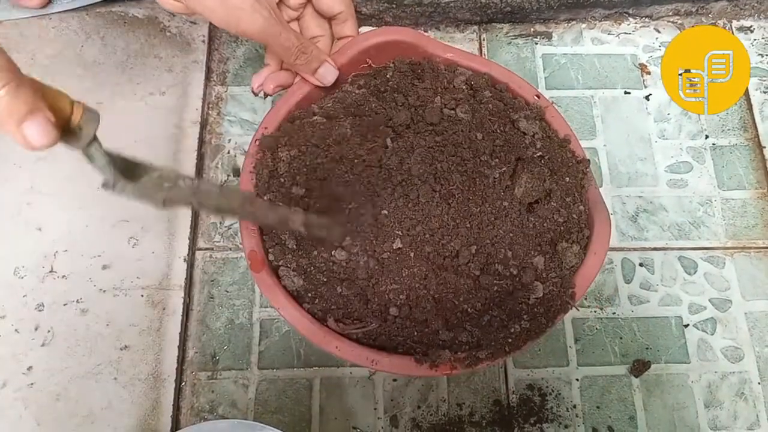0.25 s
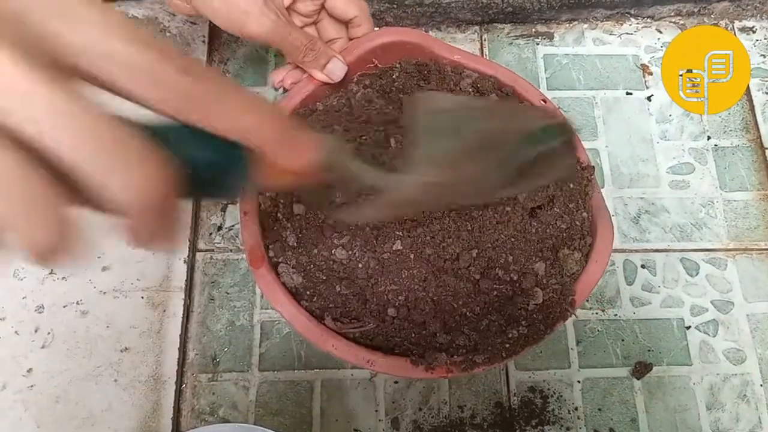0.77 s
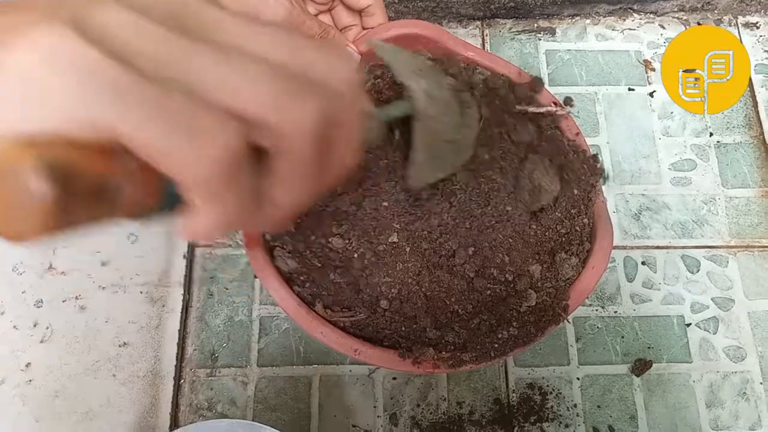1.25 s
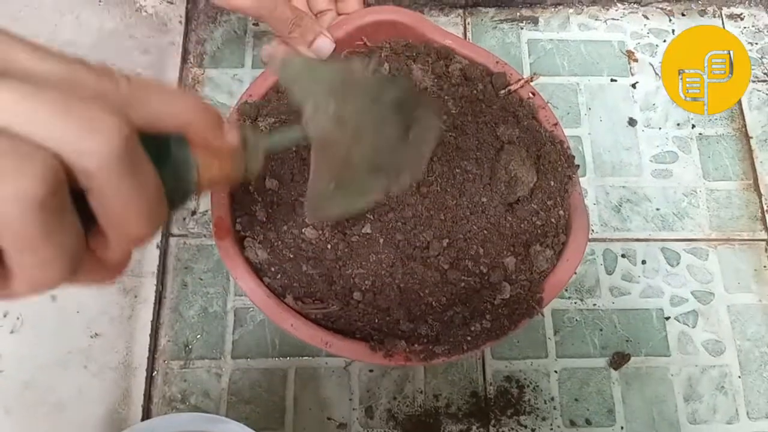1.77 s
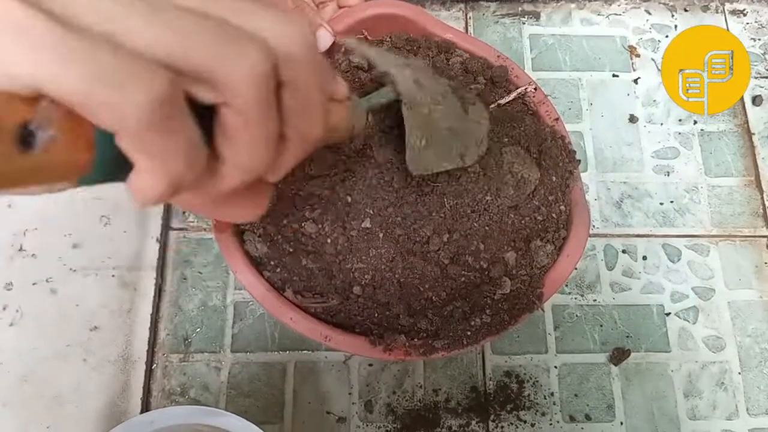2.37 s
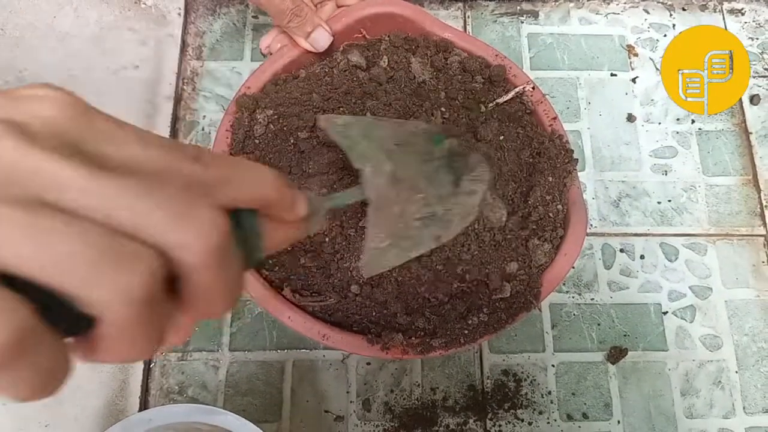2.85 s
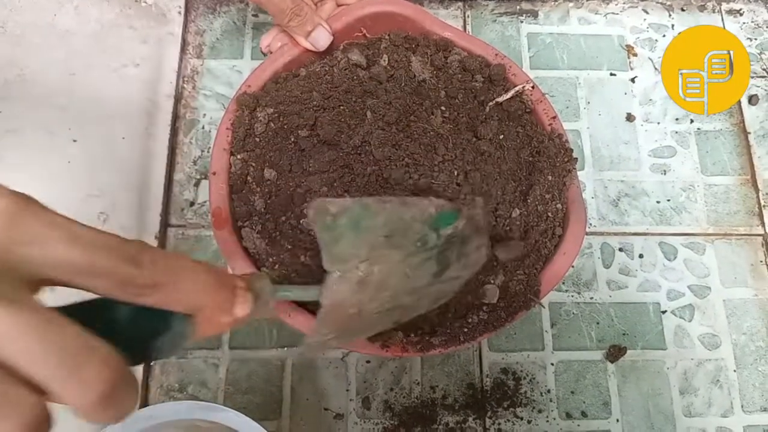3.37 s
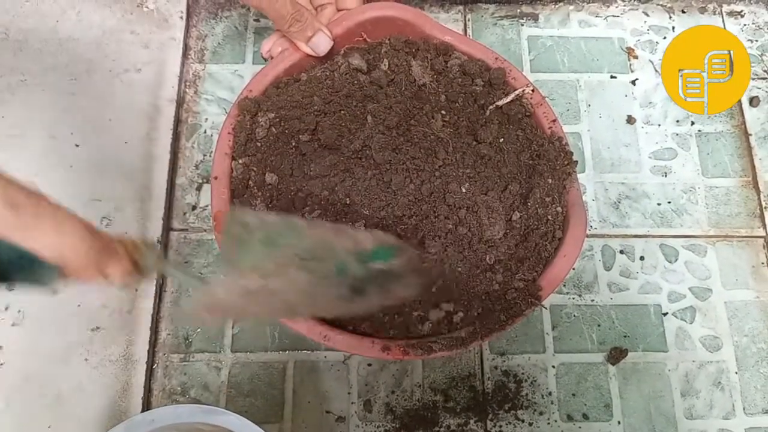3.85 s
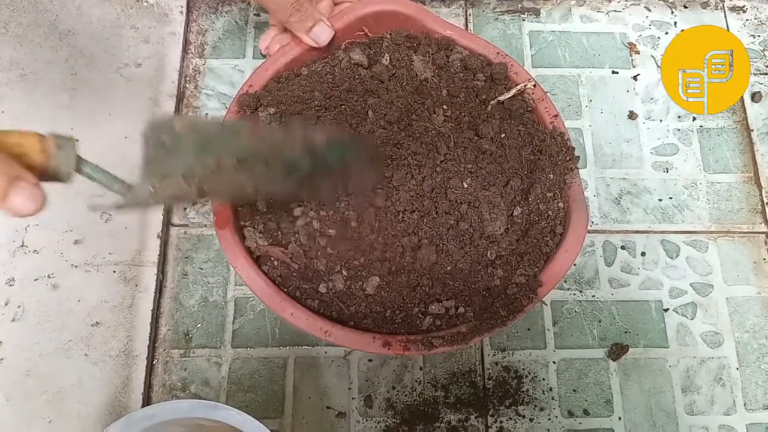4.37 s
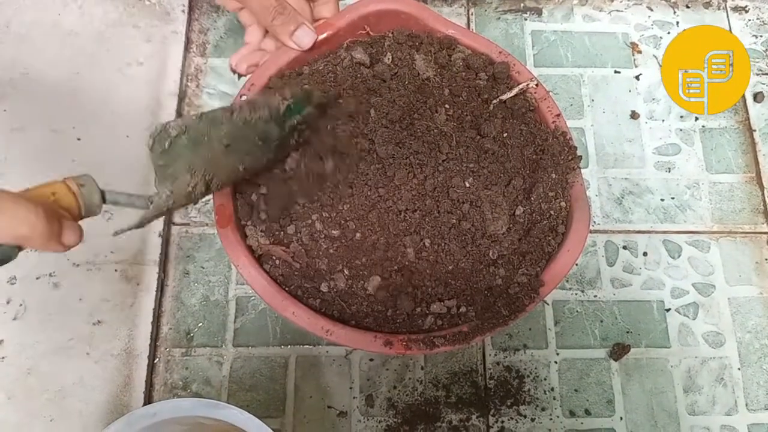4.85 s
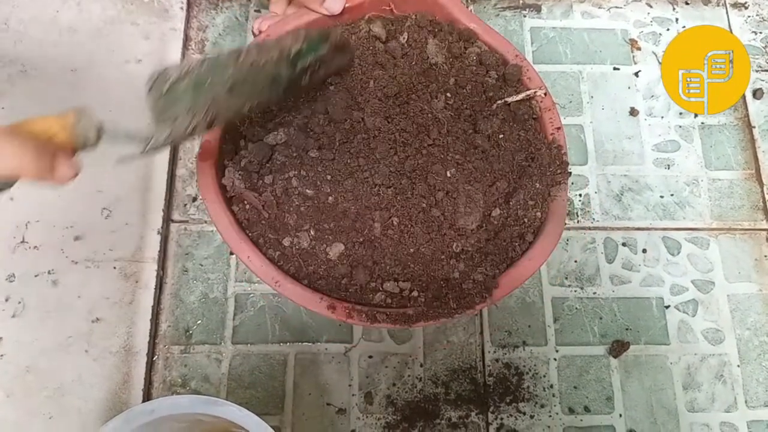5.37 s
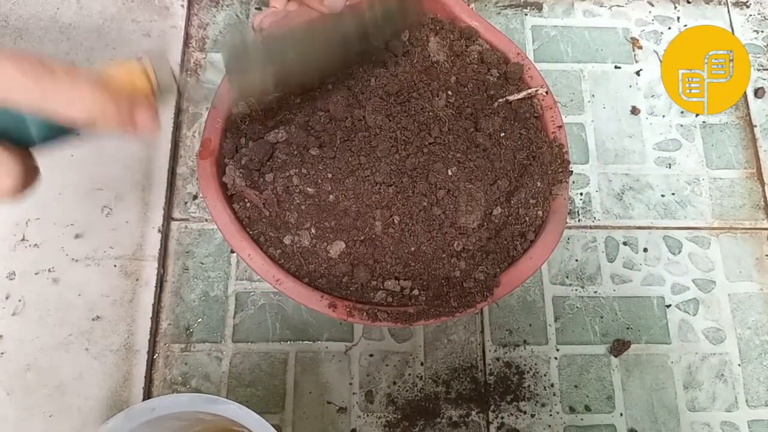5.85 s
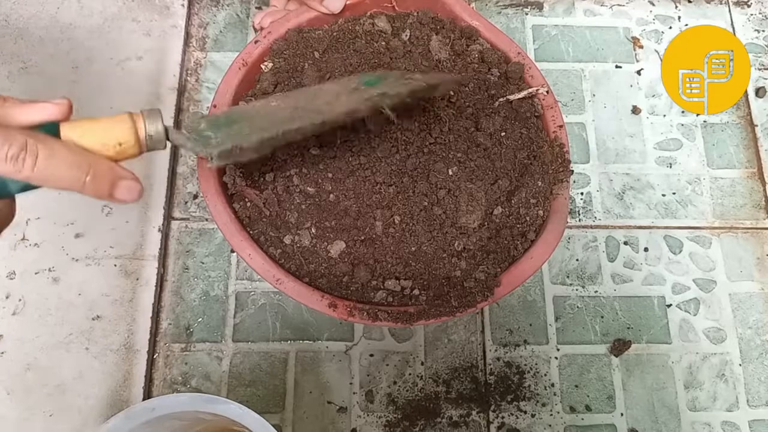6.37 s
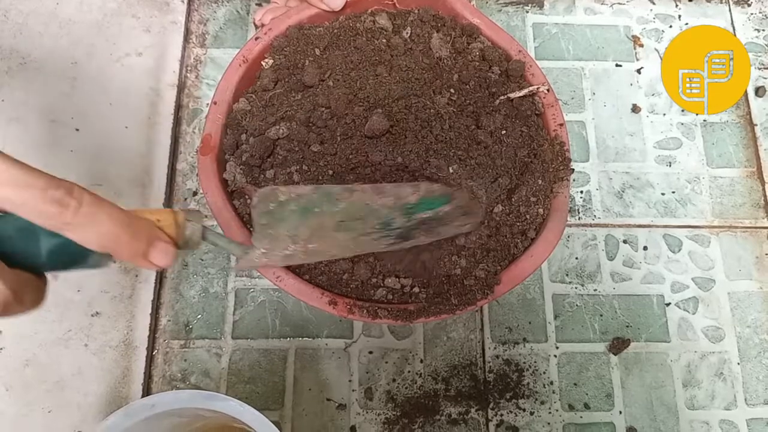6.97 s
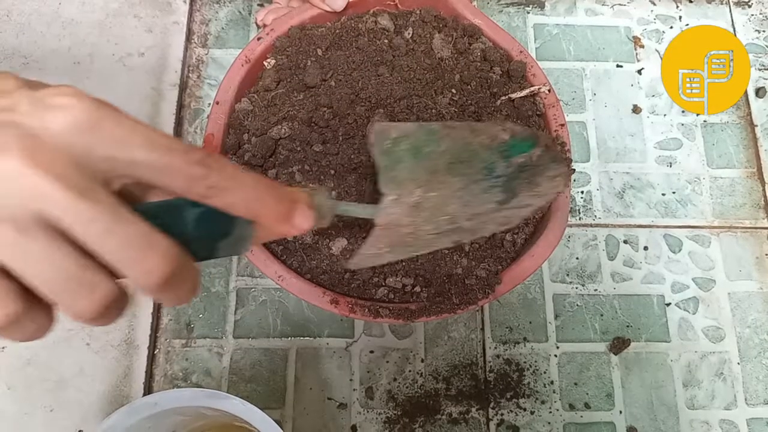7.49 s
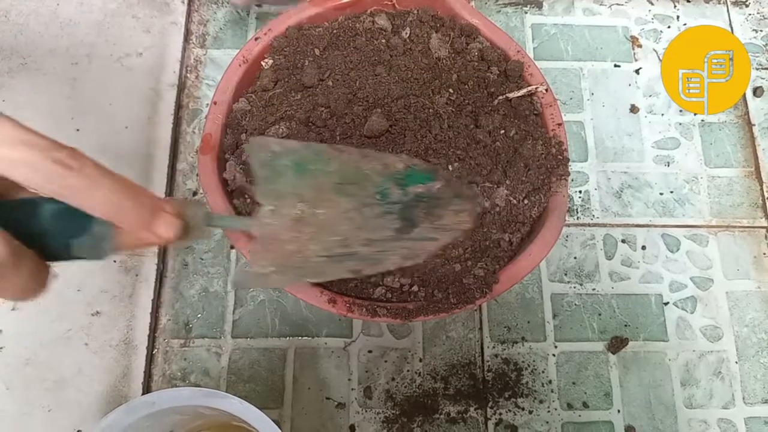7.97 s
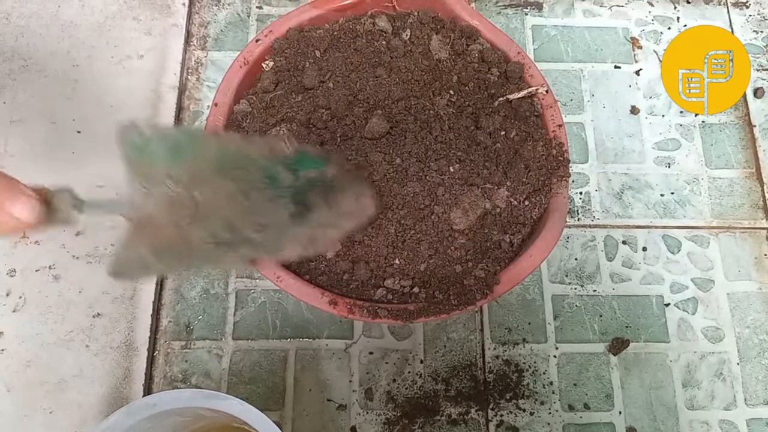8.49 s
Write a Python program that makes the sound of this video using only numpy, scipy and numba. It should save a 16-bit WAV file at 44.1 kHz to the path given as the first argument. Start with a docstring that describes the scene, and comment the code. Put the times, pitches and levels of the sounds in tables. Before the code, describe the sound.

A steel hand trowel works dry soil in a plastic pot, close to the microphone. It scrapes and pats in uneven strokes: grit rasps along the metal, the blade clinks briefly and the pot answers with hollow knocks. The work starts softly, a few crumbs tick on the steel, then it grows louder, with the hardest knock about halfway. A tiled porch adds a short echo over faint, distant town noise.

```python
"""Over distant town noise, a steel hand trowel works dry soil in a plastic pot on a tiled porch.
From the start it scrapes and pats: dragged grit rattles blade and pot, blows ring one and thump the other.
From 1.6 to 2 s, crumbs drop off the lifted blade and tick on the steel; then the work grows louder.
At 4.3 s comes the hardest blow on the pot, with the first of five soft, low handling thumps.
Scraping and patting go on to the end, and the porch adds a short echo to them all along."""
import sys
import numpy as np
from scipy import signal
from scipy.fft import rfft, irfft
from scipy.io import wavfile
from scipy.ndimage import uniform_filter1d
from numba import njit

SR = 44100
rng = np.random.default_rng(int(sys.argv[2]) if len(sys.argv) > 2 else 0)


def generate_wav(signal):
    """Clip the signal to [-1, 1] and save it as 16-bit WAV at the path in sys.argv[1]."""
    frames = np.transpose(np.atleast_2d(signal))
    scaled = np.clip(frames, -1, 1) * 32767
    pcm = np.round(scaled).astype(np.int16)
    wavfile.write(sys.argv[1], SR, pcm)


N = 384552

# Tone curves for the town, the rasp of soil and the hiss of fine grit: f/Hz, level/dB
TOWN_TONE = [(25, -16.5), (87, 2.5), (200, -6.5), (263, 2), (326, -4), (591, -3), (1040, -10), (2160, -15),
             (3160, -13.5), (6210, -25), (8140, -43), (12200, -44.5), (16000, -42)]
RASP_TONE = [(700, -22), (1000, -14.5), (1700, -10.5), (3100, -5.5), (4450, -12), (4900, -18.5),
             (5400, -13), (6400, -14.5), (7400, -25.5), (8500, -42.5)]
GRIT_TONE = [(7000, -28.5), (7600, -0.5), (8600, 2), (13400, -5), (15100, -2), (16000, -23)]
# Scrapes: t/s at full pressure, rise/s, hold/s, rasp level/dB, pot level/dB above the rasp,
# pot f/Hz, soil fineness/dB (higher is brighter)
SCRAPES = [(0.0, .01, 0.012, -46.5, -8, 823, -17), (0.836, 0.083, .1, -40.5, -2, 550, -20),
           (0.978, 0.027, 0.15, -42.5, -12, 653, -10.5), (1.22, 0.1, 0.064, -42, -17, 668, -7),
           (1.295, 0.017, 0.093, -37.5, -4.5, 693, -18.5), (1.556, 0.0084, 0.024, -44, -3, 600, 7.5),
           (1.628, 0.12, 0.05, -47, -3.5, 700, -5.5), (1.803, .15, 0.25, -74, 17.5, 485, -1.5),
           (2.256, 0.03, 0.0093, -51, -2.5, 853, -13), (2.345, 0.037, 0.062, -34.5, -10.5, 608, -5.5),
           (2.461, 0.054, 0.0059, -35.5, -23, 684, -7), (2.87, 0.03, 0.047, -33.5, -9.5, 770, -8.5),
           (2.932, 0.041, 0.012, -25, -8, 820, -5), (3.21, 0.028, 0.056, -38.5, -9.5, 561, -11),
           (3.775, 0.084, 0.14, -29, -3, 784, -12.5), (3.99, 0.047, 0.087, -28, -2.5, 726, -19.5),
           (4.303, 0.0049, 0.012, -22, -2.5, 628, -29), (4.367, 0.016, 0.057, -42.5, -1, 590, -25.5),
           (4.593, 0.54, 0.021, -47.5, 11, 542, -17.5), (5.09, 0.052, 0.19, -28.5, -3, 506, -11.5),
           (5.204, 0.051, 0.077, -23.5, 0, 483, -10.5), (7.12, 0.16, 0.15, -77, 30.5, 377, -4.5),
           (7.767, 0.035, 0.012, -52, 10.5, 358, -18), (7.987, 0.2, 0.028, -44, -7, 609, -11.5),
           (8.183, 0.14, 0.048, -30.5, -3.5, 482, -16.5), (8.275, 0.038, 0.067, -43.5, -1, 441, -14.5),
           (8.48, 0.35, 0.075, -53.5, 6, 448, -16)]
# Modes, the tones that blade and pot ring with: f/Hz, level/dB, time to fade by 60 dB/s
BLADE_MODES = [(1260, -18, .3), (1670, -14, .2), (1850, -13, .15), (2350, -10, .22), (2600, -9, .25),
               (2830, -13, .15), (3170, 0, .36), (3420, -6, .3), (4200, -12, .28), (4500, -6, .38),
               (5290, -7, .3), (5830, -8, .28), (6400, -11, .36), (7140, -20, .15)]
POT_MODES = [(263, -12, 0.37), (395.7, -18.5, 0.18), (487.8, -2.5, 0.13), (634.6, -8.5, 0.11),
             (713.9, -2.5, 0.066), (800, 2, 0.027), (890.2, -5, 0.12)]
# How freely the main blade mode sounds while dragged through soil: t/s, level/dB
DRAG_RINGING = [(2.4, -8), (2.95, 10), (3.8, 0), (4.05, -6), (7.9, 1.5)]
# Blows: t/s, blade level/dB, pot level/dB, crunch level/dB, brightness f/Hz, contact time/ms,
# main mode boost/dB
TROWEL_BLOWS = [(0.033, -70, -44.5, -48, 2500, 3.9, 4), (0.203, -54, -55, -45.5, 2250, 1.7, -16),
                (0.227, -49, -76, -51, 4500, 1.1, 6), (0.299, -79, -51, -47.5, 1920, 0.85, -25),
                (0.349, -44.5, -80, -62, 3980, 3, 10.5), (0.42, -35, -68, -60, 3080, 13.3, 20),
                (0.446, -36, -71, -42, 1830, 0.93, -10), (0.808, -53, -48, -29.5, 2480, 14.4, -38),
                (0.968, -65, -21.5, -29.5, 1920, 0.54, -26), (1.057, -68, -39.5, -30.5, 4120, 6, -2),
                (1.25, -20, -28, -16, 4120, 23.8, -9), (1.3, -50, -26, -24, 2620, 6.9, -13),
                (1.564, -47, -41.5, -32, 7000, 1.4, -20), (2.393, -36, -32, -28, 4340, 9.8, -21),
                (2.469, -33, -44.5, -36.5, 4050, 12, -13), (2.67, -21.5, -15.5, -21.5, 2200, 5.2, -23),
                (2.869, -29.5, -36, -46, 3770, 7.4, -5), (3.195, -24, -24.5, -26, 4230, 3.7, -23),
                (3.467, -43.5, -75, -34.5, 3000, 6, 7), (3.677, -32.5, -36, -41, 3270, 16.4, -0.5),
                (3.792, -13.5, -36, -26.5, 3560, 5.3, 13.5), (4.066, -57, -21, -32, 2740, 4.4, -6.5),
                (4.276, -87, -7.5, -10, 1530, 2.57, -8), (4.808, -38, -15, -15.5, 2900, 2.3, -12),
                (4.904, -40, -66, -19, 4900, 9.7, -10), (5.205, -42, -19, -15.5, 4300, 6, -24),
                (5.52, -17.5, -67, -16.5, 4760, 0.75, 3), (5.776, -53, -54.5, -40, 4150, 19, -7),
                (5.976, -28, -38, -19.5, 5360, 12, -30), (6.147, -25, -43, -29.5, 3370, 4.9, -2),
                (6.33, -30, -37, -30, 2760, 2.6, -7), (6.509, -23.5, -34, -23, 3020, 1.05, -0.5),
                (6.709, -15.5, -40, -11.5, 3440, 0.55, -3.5), (7.051, -35, -56.5, -37.5, 4660, 13, -1),
                (7.368, -27.5, -14, -21, 1850, 2.9, -3), (7.41, -61, -30.5, -27.5, 3060, 5.4, -23),
                (7.68, -33, -25.5, -26.5, 2720, 7, 1), (7.758, -47, -62, -42.5, 3770, 15, -6),
                (7.897, -33.5, -40.5, -58, 3440, 7.1, 2), (8.094, -36.5, -30, -41, 2840, 0.47, 21),
                (8.142, -31.5, -54, -60, 3160, 2.1, 16), (8.165, -43, -54, -26, 3500, 5.1, -3),
                (8.207, -30, -26, -23.5, 2570, 4.3, -6), (8.481, -45.5, -44, -40, 3000, 17.7, 8)]
# Boost of the pot's lowest mode, set by where the blade lands: t/s, level/dB
POT_BASS_BOOST = [(1.3, -15), (2.67, 5), (4.3, 1.5), (5.5, -10), (6.0, -4.5), (7.7, 14)]
# Falling crumbs: t/s, level/dB
CRUMB_TICKS = [(1.639, -59), (1.68, -64), (1.742, -60), (1.799, -58.5), (2.002, -68)]
# Soft, low handling thumps: t/s, level/dB, f/Hz
LOW_BUMPS = [(4.291, -33.5, 155), (5.985, -42, 95), (6.733, -39, 119.3), (7.679, -54, 85), (7.97, -43, 85)]


def undb(db):
    """Turn decibels into a factor to multiply by."""
    return 10 ** (np.asarray(db) / 20)


def unit(x):
    """Scale a sound to an average (rms) level of 1."""
    return x / np.sqrt(np.mean(x ** 2))


def peak(x, db):
    """Scale a sound so that its loudest 4 ms have this level."""
    return x * undb(db) / np.sqrt(uniform_filter1d(x ** 2, SR // 250).max())


def colour(x, curve):
    """Turn lows and highs up or down along a tone curve."""
    hz, db = np.transpose(curve)
    f = np.arange(len(x) // 2 + 1) * SR / len(x) + 1
    return irfft(rfft(x) * undb(np.interp(np.log(f), np.log(hz), db, left=-90, right=-90)), len(x))


def fade(t60, length_s=.5):
    """A fade that is 60 dB down after t60 seconds."""
    return np.exp(-np.log(1000) * np.arange(int(length_s * SR)) / SR / t60)


def wander(rate):
    """A smooth random wobble of size about 1, with `rate` new values a second."""
    step = int(SR / rate)
    levels = np.repeat(rng.standard_normal(N // step + 1), step)
    return unit(uniform_filter1d(uniform_filter1d(levels, step), step)[:N])


@njit
def bandpass(x, hz, q):
    """Keep the sound near a pitch that may move; a higher q keeps a narrower band."""
    y, band, low = np.empty(len(x)), 0., 0.
    for i in range(len(x)):
        g = np.tan(np.pi * hz[i] / SR)
        v = (band + g * (x[i] - low)) / (1 + g * (g + 1 / q))
        band, low, y[i] = 2 * v - band, low + 2 * g * v, v / q
    return y


def main_share(hz, main_hz=3200):
    """Near 1 for the main blade mode, falling to 0 for its neighbours."""
    return np.exp(-(10 * np.log2(hz / main_hz)) ** 2)


def ring(modes, start_s, ring_share, scatter_db, split_hz, centre_hz=None):
    """Struck modes fade from start_s on; each is two close tones that throb, at a chance level."""
    t = np.arange(SR // 2) / SR
    out = 0
    for (hz, db, t60), (luck, a, b, phase) in zip(modes, rng.standard_normal((len(modes), 4))):
        if centre_hz:
            db = db - 3 * np.log2(hz / centre_hz) ** 2
        first = np.sin(2 * np.pi * (hz + split_hz * a) * t + np.pi * phase)
        second = 1.09 * np.sin(2 * np.pi * (hz + split_hz * b) * t)
        faded_db = 60 * np.maximum(t - start_s, 0) / (t60 * ring_share)
        out = out + undb(db + scatter_db * luck * (1 - main_share(hz)) - faded_db) * (first + second)
    return out


def town(level_db=-55):
    """Far rumble and hiss in bands that swell together and flicker alone; the bass comes in gusts."""
    out, swell, gust = 0, wander(3.544), wander(7.7)
    for hz in 30 * 2. ** np.arange(0, 9.1, .5):
        band = bandpass(rng.standard_normal(N), np.full(N, hz), q=3.34)
        out = out + band * undb(1.5 * swell + 2.6 * wander(14) + 2.8 * gust * (hz < 130))
    return undb(level_db) * unit(colour(out, TOWN_TONE))


def pressure(rise_db=26, fall_db_per_s=339.5, dulling=0.043):
    """Each scrape rises, holds and fades, duller when light; in overlaps the louder one sets the tone."""
    t = np.arange(0, N / SR + .002, .002)
    full_s, rise_s, hold_s, rasp_db, pot_db, pot_hz, fine_db = np.transpose(SCRAPES)[:, :, None]
    rising = np.maximum(rise_db * (full_s - t) / np.maximum(rise_s, .005), 0)
    falling = np.maximum(fall_db_per_s * (t - full_s - hold_s), 0)
    below_full_db = np.minimum(rising + falling, 150)
    power = undb(2 * (rasp_db - below_full_db))
    total = power.sum(axis=0)
    fine_db = fine_db - dulling * np.minimum(below_full_db, rise_db)
    blended = [np.sum(power * curve, axis=0) / total for curve in (pot_db, pot_hz, fine_db)]
    return [np.interp(np.arange(N) / SR, t, curve) for curve in [np.sqrt(total)] + blended]


def grains():
    """A stream of soil grains of uneven size; clods break up, which limits the largest."""
    return unit(rng.standard_normal(N) * undb(np.minimum(3.5 * rng.exponential(size=N), 15)))


def scrapes():
    """Grains slip along the blade in jerks, rattling steel and pot; the soil damps the steel."""
    gain, pot_db, pot_hz, fine_db = pressure()
    jerk = undb(3.3 * wander(45) + 2.7 * wander(200))
    force = grains() * jerk
    bend = 1 + .025 * wander(12)  # soil presses unevenly on the blade and bends its pitch

    def band(hz, q, flicker_db, rate):
        """One band of the rasp; fine dry soil favours the highs, clods the lows."""
        tilt_db = 0.9 * (fine_db + 13.0) * np.log2(hz / 3000)
        noise = bandpass(grains() * jerk, hz * bend, q)
        return noise * undb(tilt_db + flicker_db * wander(rate)) / np.sqrt(hz)

    soil = sum(band(hz, q=7., flicker_db=4., rate=22) for hz in 1000 * 2 ** np.arange(0, 3.1, .25))
    clear = undb(0.14 * (fine_db + 1.5))  # clods muffle the steel, fine soil lets it sound
    main_db = np.interp(np.arange(N) / SR, *np.transpose(DRAG_RINGING))
    # the contact wanders over the blade, so each mode comes and goes
    steel = sum(undb(0.6 * db + main_db * main_share(hz)) * np.sqrt(hz)
                * band(hz, q=21., flicker_db=5.5, rate=14) for hz, db, _ in BLADE_MODES)
    rasp = unit(colour(soil, RASP_TONE)) + unit(colour(steel, RASP_TONE)) * clear
    rasp /= np.sqrt(uniform_filter1d(rasp ** 2, SR // 8))  # even out slow swells
    hollow = force
    for _ in range(3):
        hollow = bandpass(hollow, pot_hz, q=1.8)
    walls = signal.fftconvolve(force, ring(POT_MODES, 0, .6, scatter_db=0.37, split_hz=11.8))[:N]
    pot = unit(unit(hollow) + undb(-12.0) * unit(walls))
    # sand cracks in bursts, coarse and fine grains each in their own time
    cracks = sum(bandpass(grains() * jerk, np.full(N, hz), q=2.) * undb(4.5 * wander(80))
                 for hz in (8500., 13500.))
    grit = unit(colour(cracks, GRIT_TONE)) * undb(1.8 * (fine_db + 7))
    # the free part of the blade rings on after the soil lets go
    blade_ring = ring(BLADE_MODES, 0, .75, scatter_db=2., split_hz=30.)
    free = signal.fftconvolve(gain * clear * undb(main_db) * force, blade_ring)[:N]
    free *= np.sqrt(np.mean(gain ** 2) / np.mean(free ** 2))
    return gain * (rasp + undb(pot_db) * pot + undb(-26.5) * grit) + undb(-18.5) * free


def porch(x, t60=0.24, level_db=-11, dull_hz=4500):
    """Floor and walls send back a short, dull echo."""
    tail = rng.standard_normal(SR // 2) * fade(t60)
    tail[:int(.004 * SR)] = 0
    tail = signal.lfilter(*signal.butter(1, dull_hz, fs=SR), tail)
    return undb(level_db) * signal.fftconvolve(x, tail / np.sqrt(np.sum(tail ** 2)))[:N]


def rattle(noise, modes, scatter_db=5., width_hz=45., valley_db=-17):
    """Noise takes on the blade's tones, blurred while crumbs chatter on the steel."""
    f = np.arange(len(noise) // 2 + 1) * SR / len(noise)
    humps = 0
    for (hz, db, _), luck in zip(modes, rng.standard_normal(len(modes))):
        height = undb(2.24 * db + scatter_db * luck * (0.5 - main_share(hz)))
        humps = humps + height / (1 + ((f - hz) / width_hz) ** 2)
    return irfft(rfft(noise) * (humps + undb(valley_db)), len(noise))


def blows():
    """Each blow rings blade and pot and crushes some soil; a sliding contact swells slowly."""
    ring_share = 0.62  # hand and soil leave this share of the ringing time
    out, lead, length = np.zeros(N + SR), SR // 50, SR // 2
    t = (np.arange(length) - lead) / SR
    for at_s, blade_db, pot_db, crunch_db, bright_hz, contact_ms, main_db in TROWEL_BLOWS:
        contact_s = contact_ms / 1000
        ring_s = lead / SR + contact_s
        after = np.maximum(t - contact_s, 0)
        rise = np.clip(t / contact_s, 0, 1) ** 2
        # soil or rim damps the steel while they touch; then it rings on more softly
        touch = rise * (np.exp(-after / 0.0075) + undb(-27))
        coarse, fine = rng.standard_normal((2, length))
        upper_db = 8 * np.log2(bright_hz / 3800)  # brighter blows wake the modes near 4400 Hz more
        steel = [(hz, db + main_db * main_share(hz) + upper_db * (abs(hz - 4400) < 300), t60)
                 for hz, db, t60 in BLADE_MODES]
        blade = ring(steel, ring_s, ring_share, scatter_db=5.5, split_hz=45., centre_hz=bright_hz)
        blade *= touch + rise * undb(-18)
        blade *= 1 + .7 * unit(uniform_filter1d(fine, SR // 150))  # clinging soil roughens the ring
        bass_db = np.interp(at_s, *np.transpose(POT_BASS_BOOST))
        plastic = [(hz, db + bass_db * (hz < 300), t60) for hz, db, t60 in POT_MODES]
        pot = ring(plastic, ring_s, ring_share, scatter_db=1.5, split_hz=6.)
        pot *= rise * (np.exp(-after / 0.0037) + undb(-3.5))
        # loose crumbs are met just before the firm contact
        crumbs = undb(-21.5) * np.exp(-abs(t) / min(1.3 * contact_s, .004))
        centre_hz = np.full(length, float(bright_hz))
        crunch = bandpass(rattle(colour(coarse, RASP_TONE), steel), centre_hz, q=0.9)
        crunch = bandpass(crunch * (touch + crumbs) * np.exp(-after / 0.029), centre_hz, q=0.57)
        # brighter blows throw more grit
        grit_db = max(blade_db, crunch_db) - 35 + 16 * np.log2(bright_hz / 3300)
        grit = colour(fine, GRIT_TONE) * rise * np.exp(-after / 0.0061)
        blow = peak(blade, blade_db) + peak(pot, pot_db) + peak(crunch, crunch_db) + peak(grit, grit_db)
        out[int(at_s * SR) - lead:][:length] += blow
    return out[:N]


def falling_crumbs():
    """Dry crumbs drop off the lifted blade and tick faintly on the steel."""
    out = np.zeros(N)
    for at_s, db in CRUMB_TICKS:
        burst = rng.standard_normal(SR // 10) * fade(0.044, length_s=.1)
        tick = bandpass(burst, np.full(len(burst), 6500.), q=.5)
        out[int(at_s * SR):][:len(tick)] += peak(tick, db)
    return out


def low_bumps(rise_s=0.0079):
    """Soft, low handling thumps, each a few low waves that swell and sink."""
    out, t = np.zeros(N + SR), np.arange(SR // 4) / SR
    swell = t / rise_s * np.exp(1 - t / rise_s)
    for at_s, db, hz in LOW_BUMPS:
        out[int(at_s * SR):][:len(t)] += undb(db) * swell * np.sin(2 * np.pi * hz * t)
    return out[:N]


def scene():
    """Both channels carry the same mix, a little louder on the right."""
    low_cut = signal.butter(6, 225, "high", fs=SR, output="sos")
    trowel = signal.sosfilt(low_cut, blows() + scrapes() + falling_crumbs())
    return (trowel + porch(trowel) + town() + low_bumps()) * undb([[-0.45], [0.45]])


def record(dry):
    """A phone close by clips anything past full scale and cuts the highest treble."""
    treble_cut = signal.ellip(10, .2, 80, 16100, fs=SR, output="sos")
    return signal.sosfilt(treble_cut, np.clip(dry, -1, 1))


dry = scene()
out = record(dry)
generate_wav(out)
```